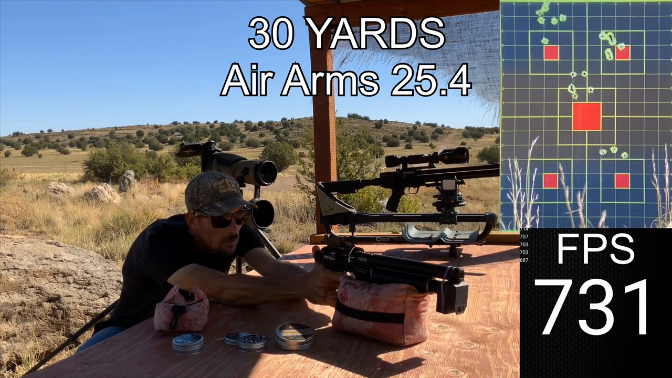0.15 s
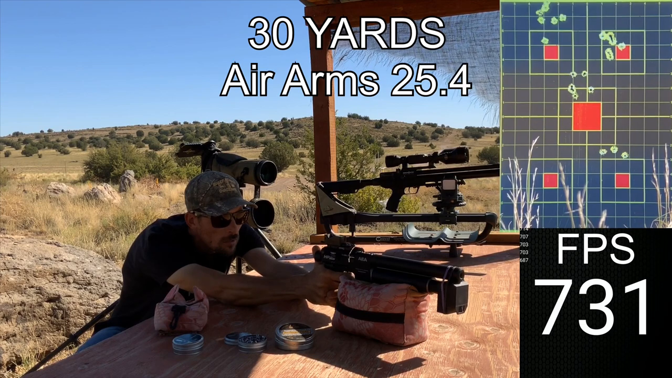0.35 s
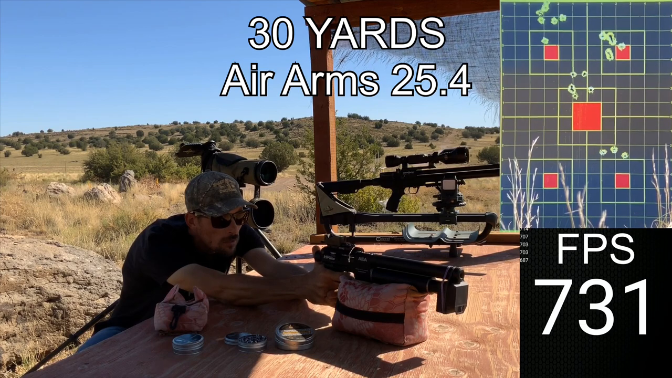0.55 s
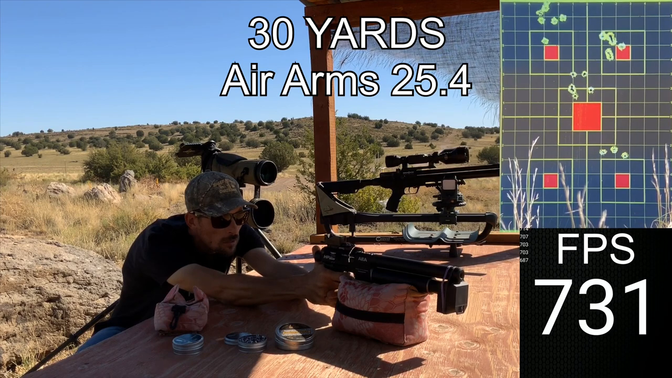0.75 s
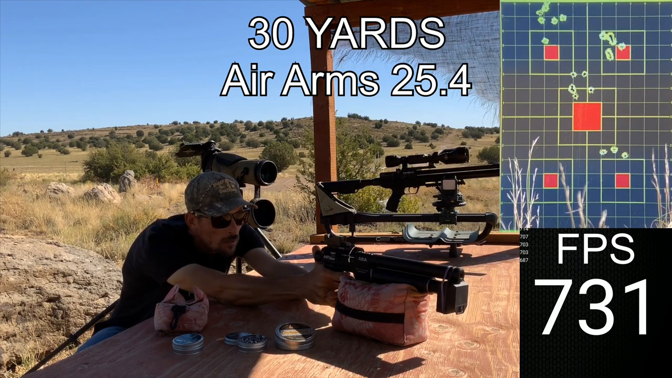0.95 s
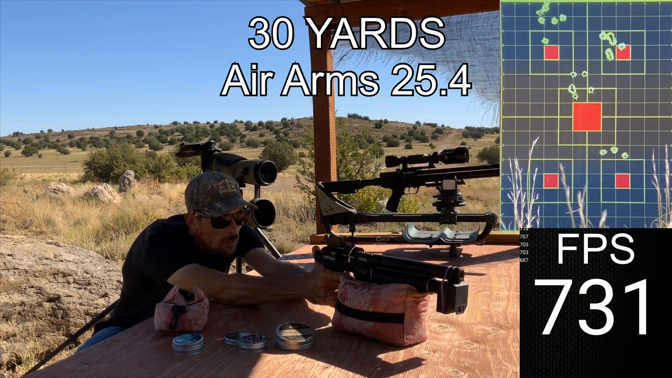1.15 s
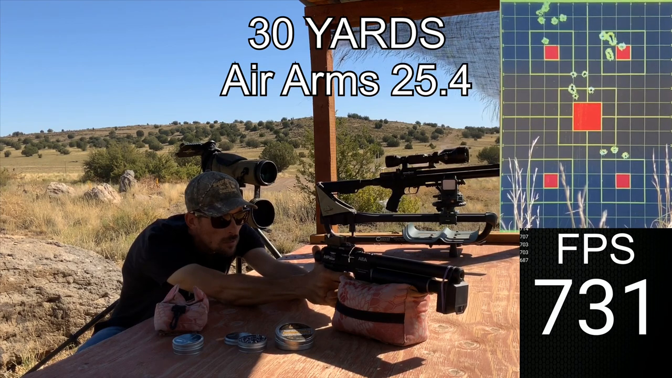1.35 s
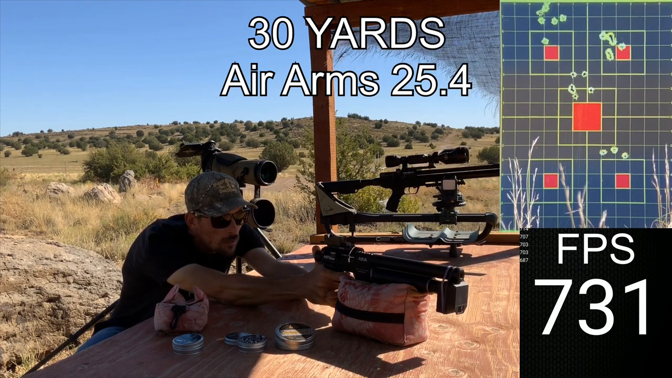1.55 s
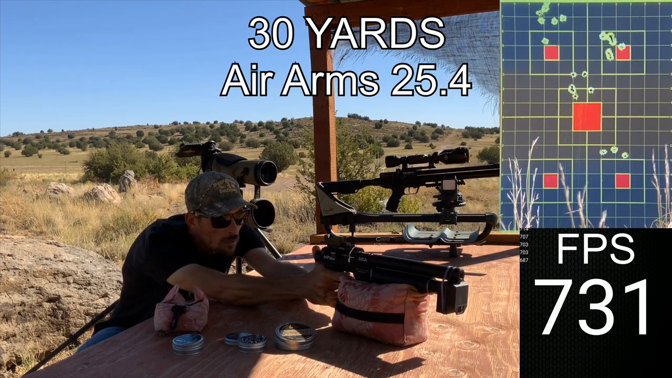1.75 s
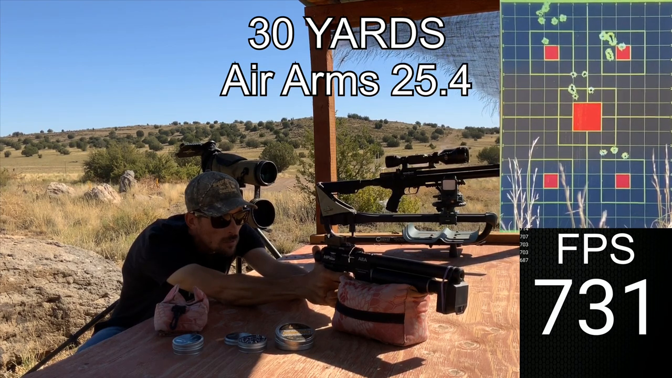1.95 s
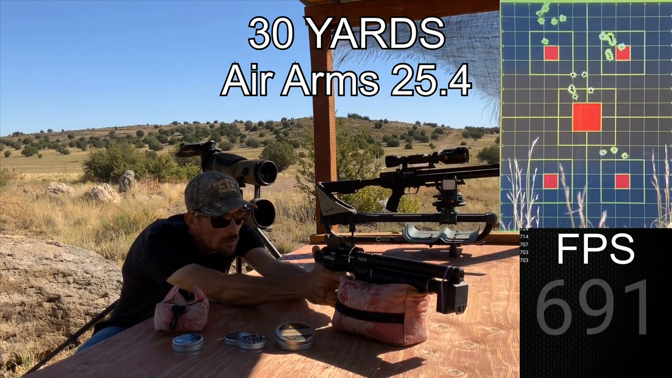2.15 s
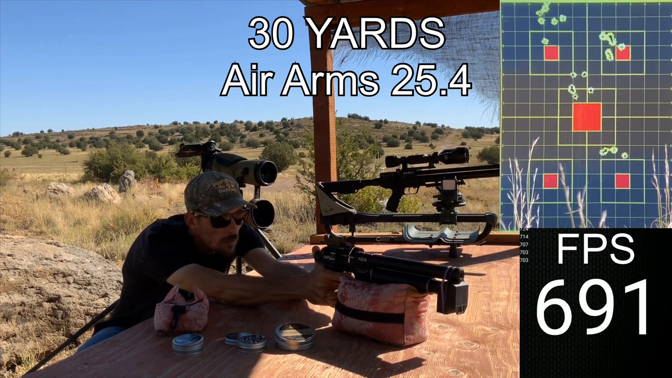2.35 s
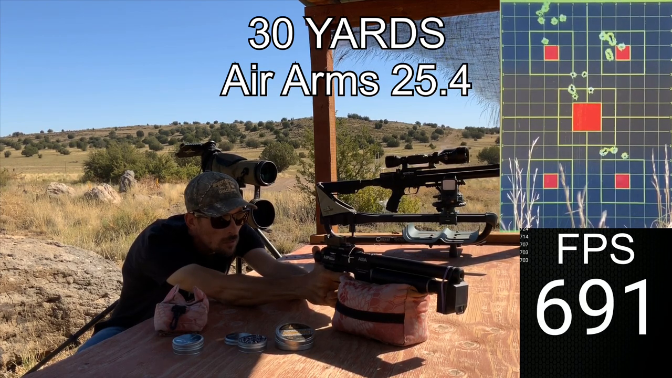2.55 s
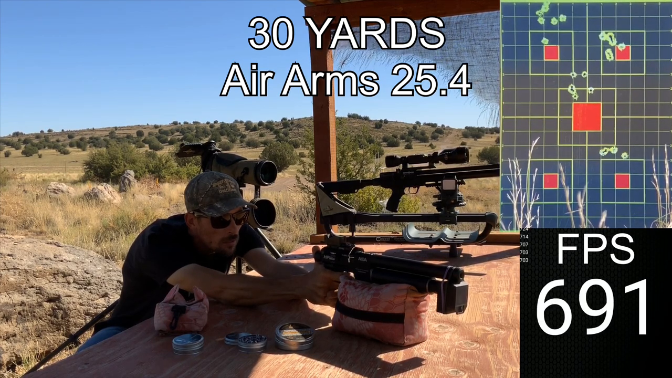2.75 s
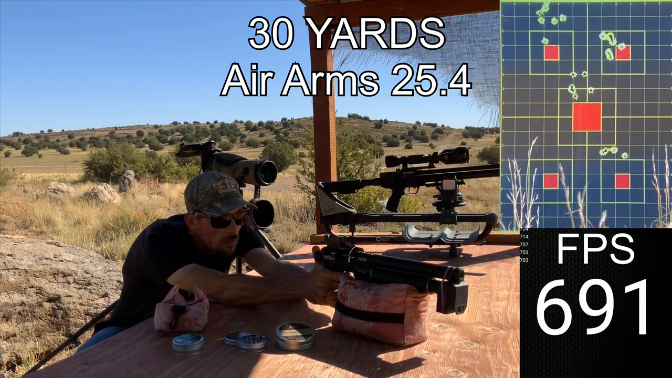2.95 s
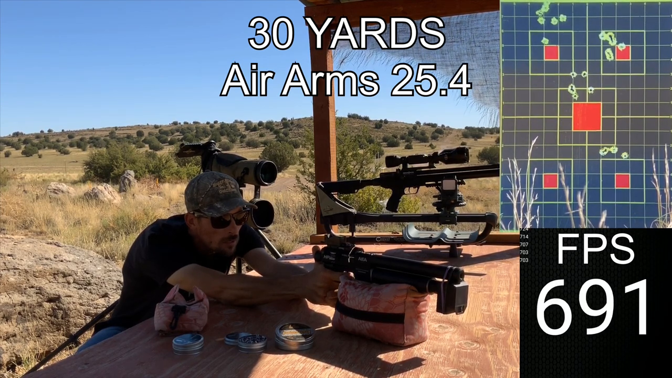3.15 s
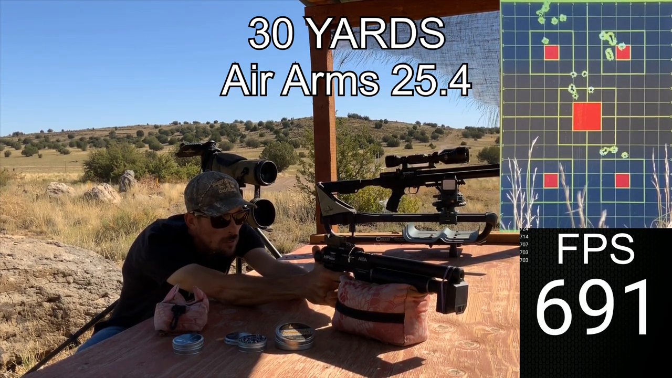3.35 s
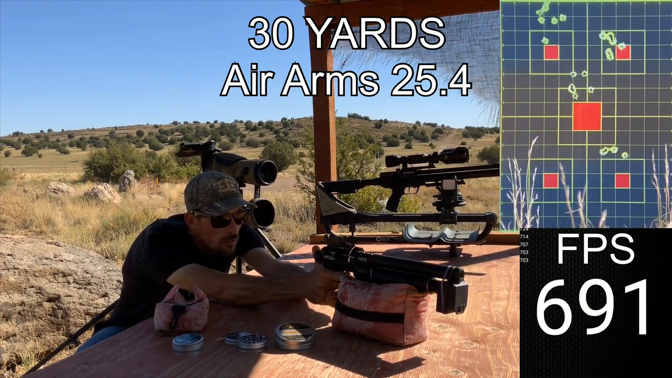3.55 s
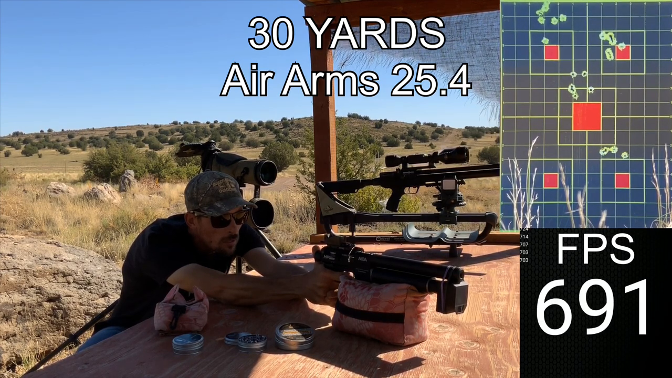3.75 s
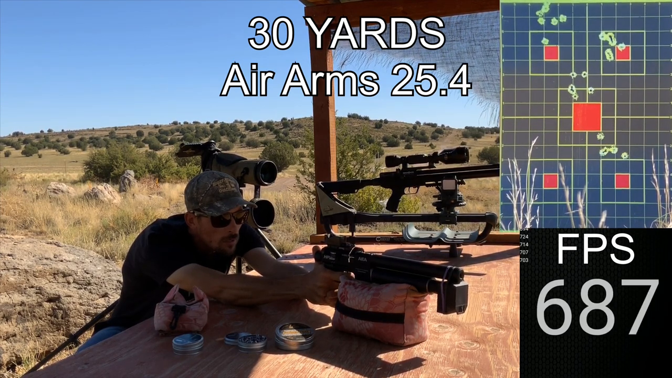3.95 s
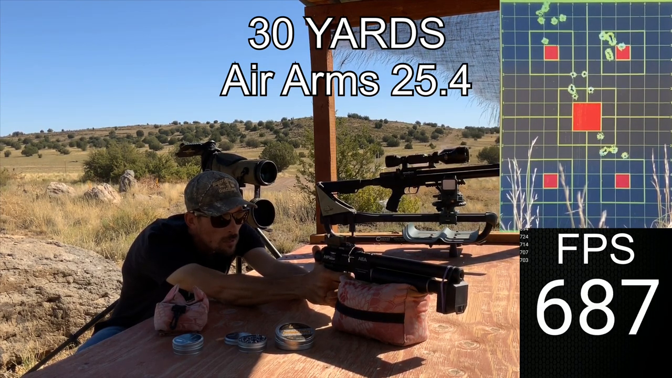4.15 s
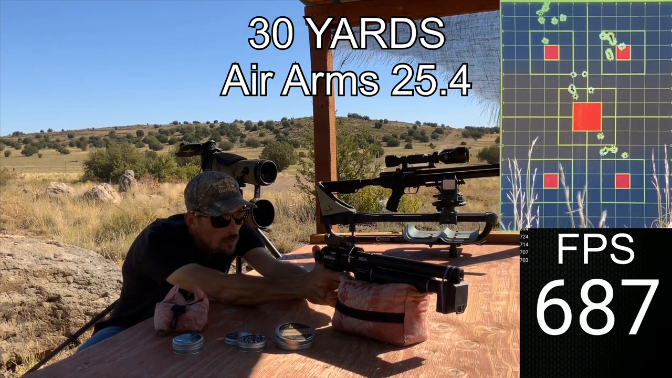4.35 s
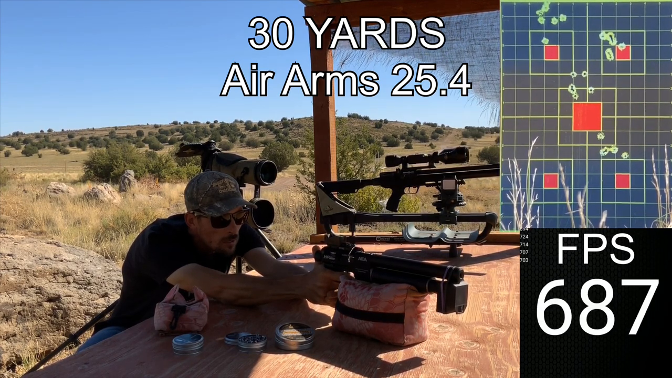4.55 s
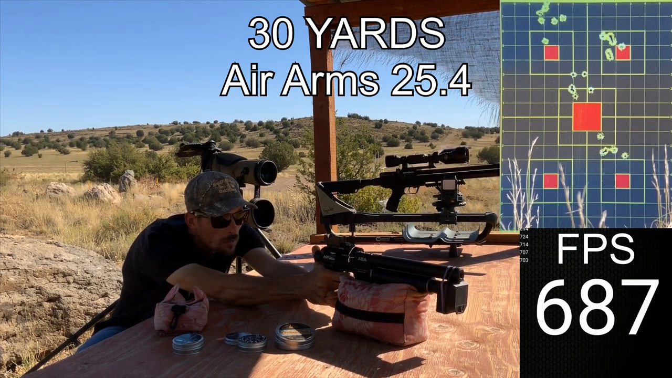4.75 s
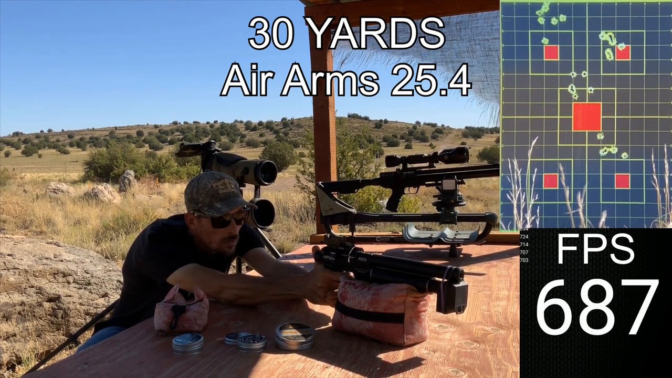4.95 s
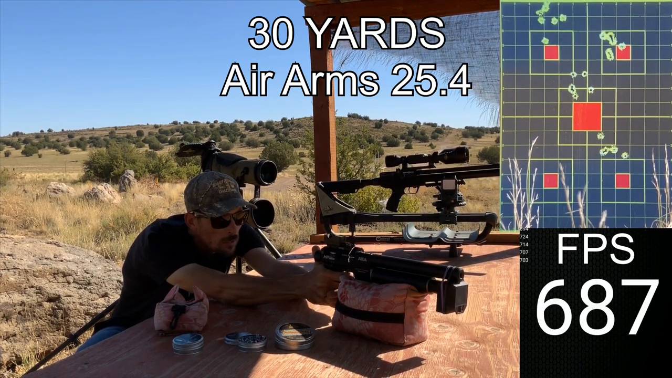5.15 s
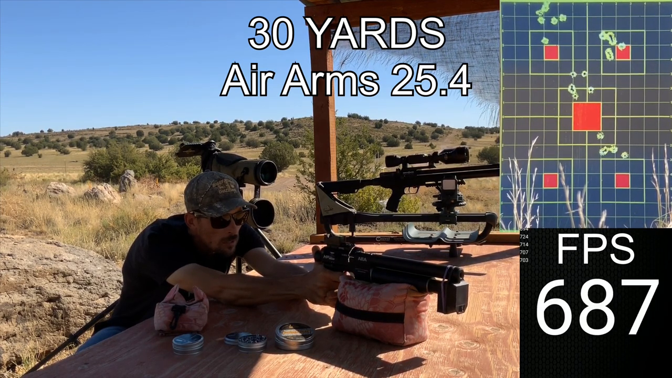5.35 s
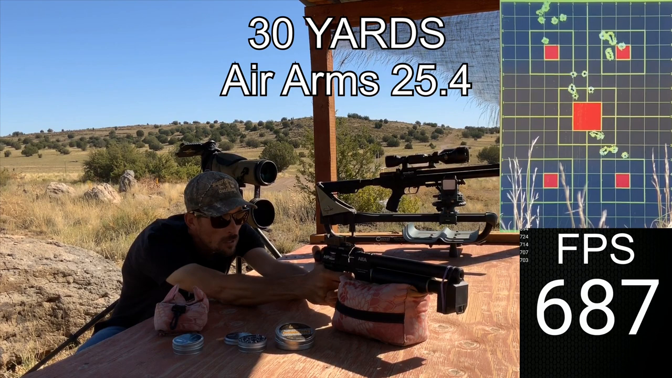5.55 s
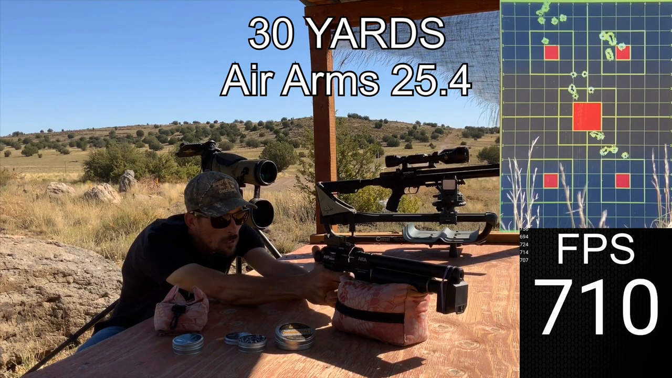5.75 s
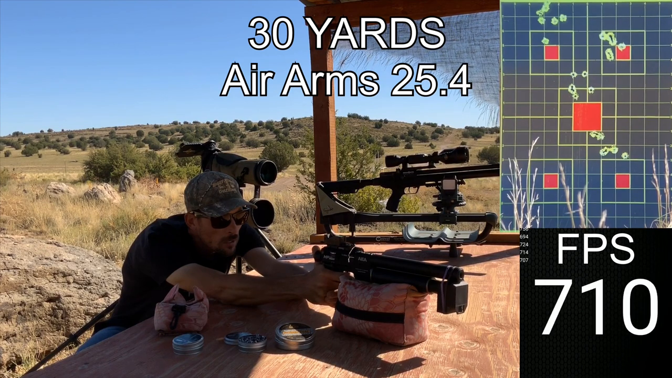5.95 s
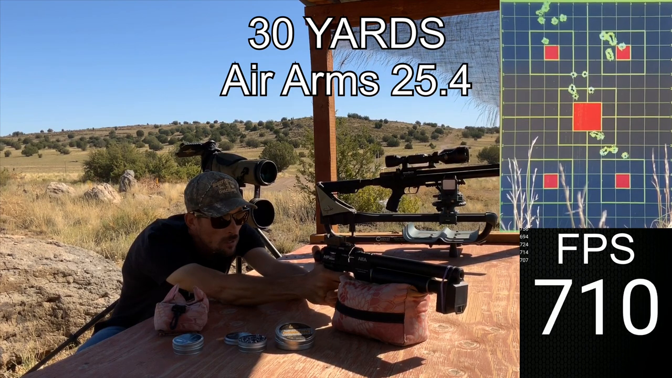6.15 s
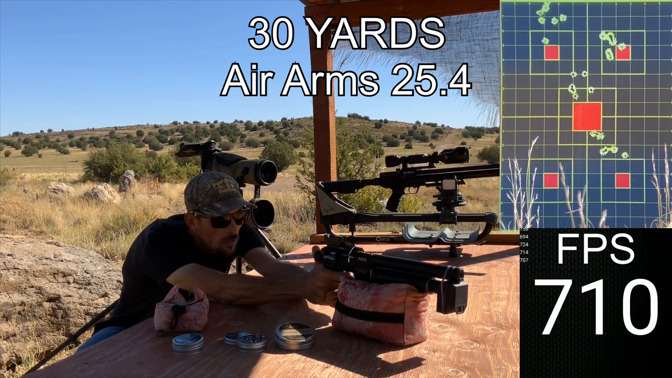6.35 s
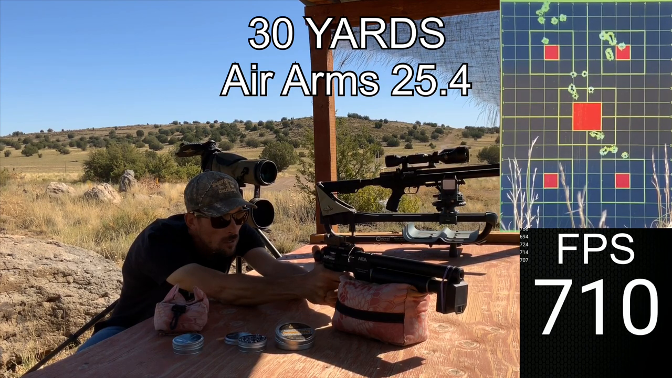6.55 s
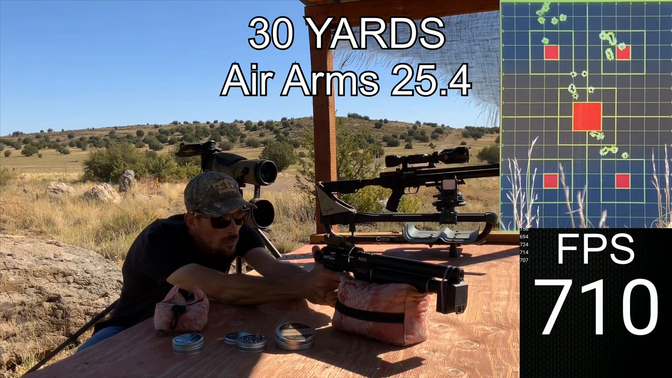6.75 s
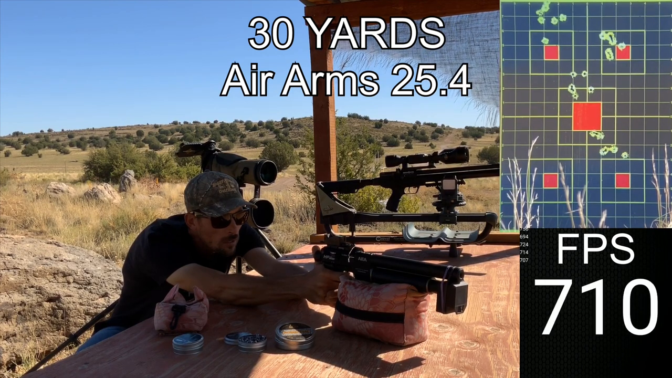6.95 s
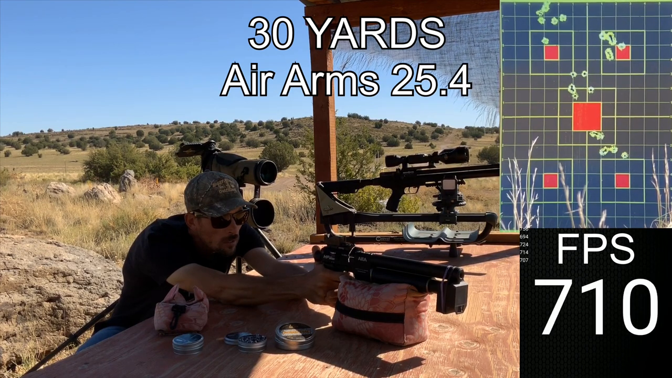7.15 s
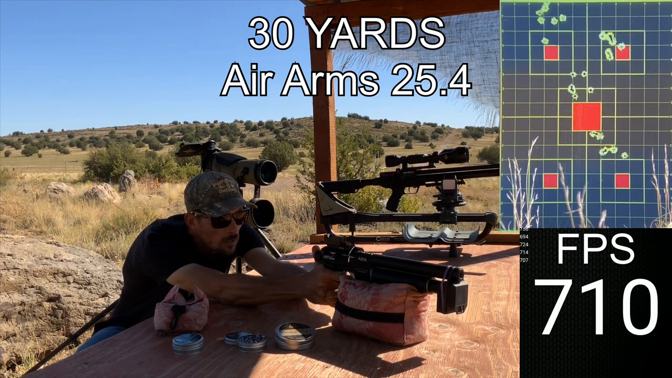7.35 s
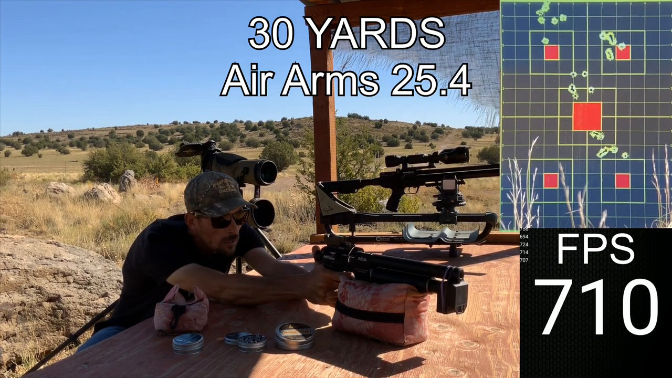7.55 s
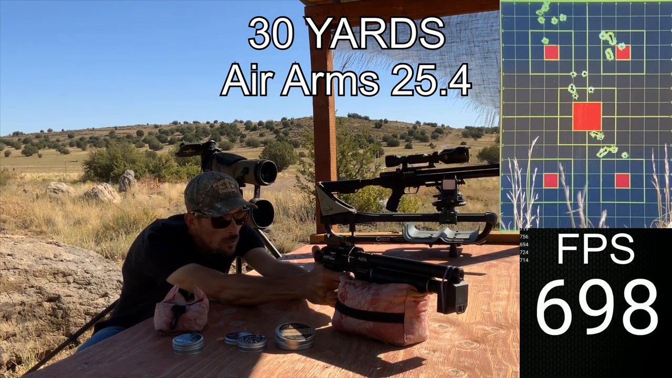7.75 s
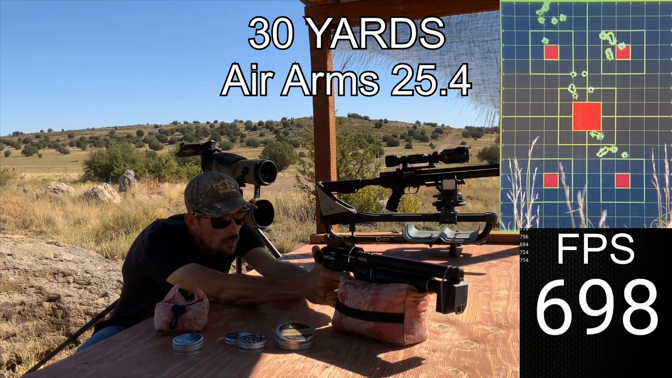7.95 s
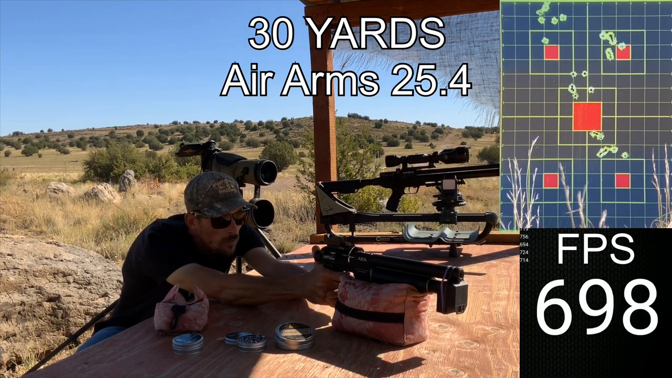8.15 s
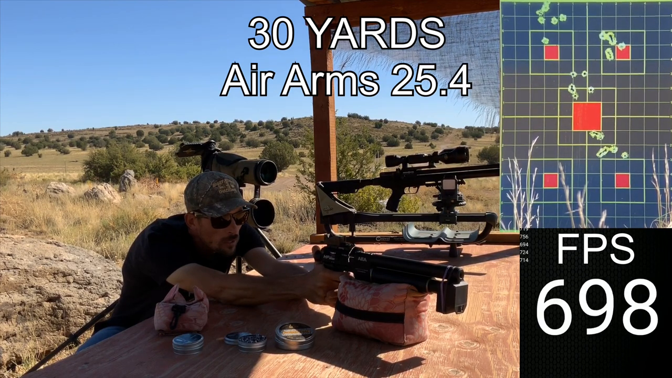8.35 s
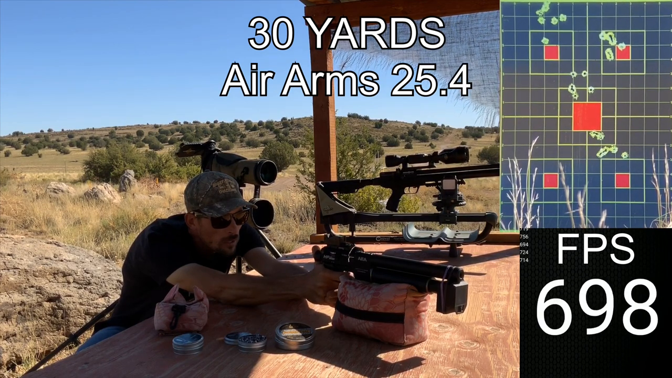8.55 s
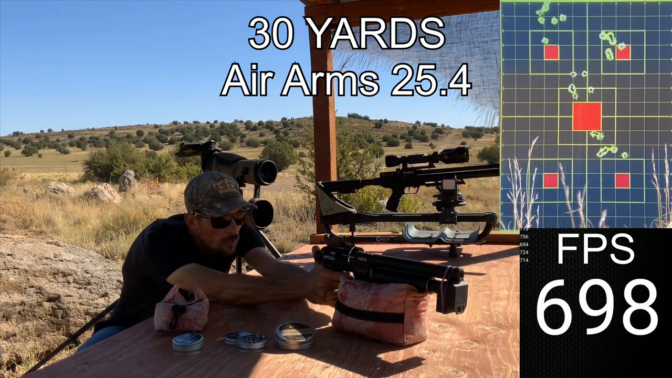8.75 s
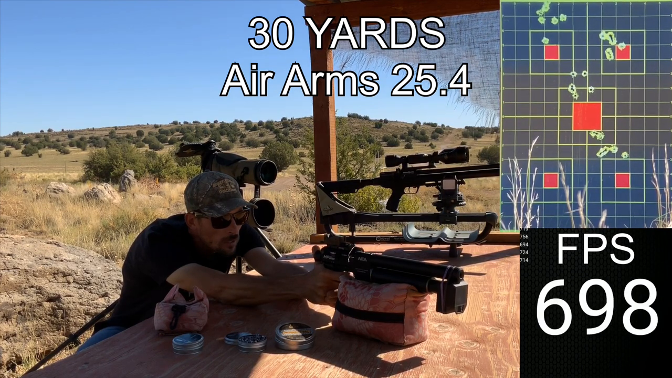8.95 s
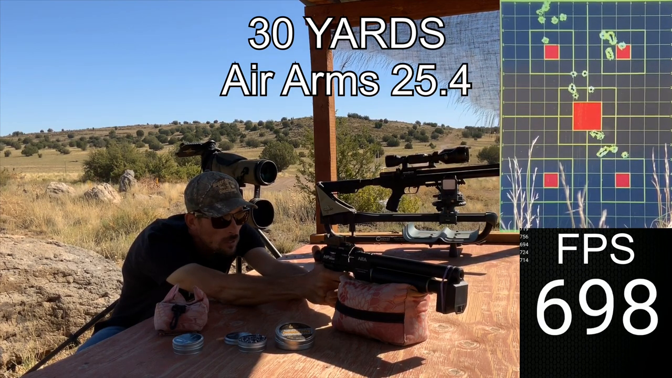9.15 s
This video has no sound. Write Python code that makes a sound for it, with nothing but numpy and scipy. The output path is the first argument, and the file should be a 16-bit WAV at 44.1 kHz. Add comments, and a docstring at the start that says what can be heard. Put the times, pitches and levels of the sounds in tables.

```python
"""An air gun fires five times from a wooden bench under a shelter at an outdoor range.
Each shot is a hiss of valve air, two hard slaps and a boom of the bench. About 0.2 s later the pellet
goes through the target board and rings a steel trap; loose bits patter after the hardest hit.
A few knocks and ticks fall in between. A far engine hums in light wind."""
import sys
import numpy as np
from scipy import signal
from scipy.fft import rfft, irfft
from scipy.io import wavfile
from scipy.ndimage import uniform_filter1d

SR = 44100
rng = np.random.default_rng(int(sys.argv[2]) if len(sys.argv) > 2 else 0)


def generate_wav(signal):
    """Clip the signal to [-1, 1] and save it as 16-bit WAV at the path in sys.argv[1]."""
    frames = np.transpose(np.atleast_2d(signal))
    scaled = np.clip(frames, -1, 1) * 32767
    pcm = np.round(scaled).astype(np.int16)
    wavfile.write(sys.argv[1], SR, pcm)


N = 409688
EVENT_SAMPLES = 2 ** 16
AGE_S = np.arange(EVENT_SAMPLES) / SR
TIME_S = np.arange(N) / SR

# shots: (valve opens [s], air release length [ratio], flight to board [s], board gain [dB],
# trap gain [dB], place on plate [0 centre, 1 edge])
SHOTS = [(.039, 0.97, .203, 0, .5, .08), (2.065, 0.93, .205, 0, 0, .06), (3.795, 1.15, .206, 1, .5, .97),
         (5.349, 1.15, .205, 0, 1.2, .97), (7.285, 1.02, .209, -7, -2, .15)]
# noise colours of a hit in the trap and of a high spray: (frequency [Hz], relative density [dB])
SPLASH_COLOUR = [(700, -1.5), (1050, 7.5), (1500, 9.5), (2000, 4.5), (2800, -7), (4200, -15.5),
                 (5500, -0.5), (7000, 2.5), (8800, -1.5), (10000, -25), (15000, -34.5)]
SPRAY_COLOUR = [(5000, -22.5), (8000, -15), (10000, -4), (11500, 2), (12700, -13), (14000, -7.5),
                (15500, -19.5)]


def amp(db):
    """Decibels to gain."""
    return 10 ** (np.asarray(db) / 20)


def gains(points, size):
    """Gain per Fourier bin from (frequency [Hz], level [dB]) points."""
    hz, db = np.transpose(points)
    bin_hz = np.arange(size // 2 + 1) * SR / size
    return amp(np.interp(np.log(bin_hz + 1), np.log(hz), db))


def noise(colour, size, count):
    """Independent noises of one colour, rms 1, rolled off below its lowest point."""
    hz = np.arange(size // 2 + 1) * SR / size
    skirt = np.minimum(hz / colour[0][0], 1) ** 4
    x = irfft(rfft(rng.standard_normal((count, size))) * gains(colour, size) * skirt, size)
    return x / x.std()


def stereo(mid, side):
    """Mid/side to left/right."""
    return np.stack([mid + side, mid - side], axis=-2)


def swell(rise_s, t60_s):
    """Smooth rise, exponential decay."""
    attack = np.sin(np.pi / 2 * np.minimum(AGE_S / rise_s, 1)) ** 2
    return attack * np.exp(-np.log(1000) * np.maximum(AGE_S - rise_s, 0) / t60_s)


def walk(rate_hz):
    """Smoothed random steps, spread near 1."""
    size = int(SR / rate_hz)
    steps = np.repeat(rng.standard_normal(N // size + 1), size)
    return uniform_filter1d(steps[:N], size)


def humps(rows):
    """Bell-shaped level lifts over time, in dB."""
    return sum(db * np.exp(-((TIME_S - peak_s) / half_s) ** 2) for peak_s, half_s, db in rows)


def add(out, start_s, x):
    """Mix in one event."""
    i = max(int(start_s * SR), 0)
    out[:, i:i + EVENT_SAMPLES] += x[..., :N - i]


def bursts(colour, db, wide_db, grain_db=2, alike_hz=2800, grain_samples=48):
    """One gritty stereo noise per shot: lows repeat from shot to shot, highs are new."""
    # stereo width: (frequency [Hz], side minus mid before wide_db [dB])
    width = [(60, -16), (150, -13), (330, -12.5), (520, -4.5), (1200, -10.5), (2200, 1.5), (4400, -3),
             (8000, -11), (15000, -16.5)]
    count = len(SHOTS) + 1
    spectra = rfft(noise(colour, EVENT_SAMPLES, count=2 * count)).reshape(2, count, -1)
    hz = np.arange(spectra.shape[-1]) * SR / EVENT_SAMPLES
    alike = 1 / (1 + (hz / alike_hz) ** 2)
    mid, side = np.sqrt(alike) * spectra[:, :1] + np.sqrt(1 - alike) * spectra[:, 1:]
    side = side * gains(width, EVENT_SAMPLES) * amp(wide_db)
    # turbulence and scattered paths: the level jumps by the millisecond
    jumps = uniform_filter1d(rng.standard_normal(EVENT_SAMPLES), grain_samples)
    jumps = uniform_filter1d(jumps, grain_samples)
    grit = amp(grain_db * jumps / jumps.std())
    return amp(db) * grit / np.sqrt(np.mean(grit ** 2)) * stereo(irfft(mid), irfft(side))


def wind(start_db=-56, fall_db_per_s=0.63, side_db=-14, eddy_db=2, eddy_top_hz=700, hiss_db=-76.5):
    """Low wind dies down between gusts and shakes in eddies, with a faint flickering hiss."""
    # gusts: (peak [s], half length [s], lift [dB])
    gusts = [(1.6, 0.38, 1), (2.55, .3, 4), (5.9, .5, 4)]
    # wind and hiss colours: (frequency [Hz], relative density [dB])
    air_colour = [(45, -39.5), (60, -20), (75, -3.5), (166, -1.5), (195, -9.5), (249, -11.5), (290, -16.5),
                  (659, -28.5), (962, -33), (2280, -44), (11000, -51.5), (16000, -62)]
    hiss_colour = [(500, 1.5), (3000, -2.5), (9500, -10), (11000, -5), (12500, -15.5), (16000, -20)]
    level_db = start_db - fall_db_per_s * TIME_S + humps(gusts)
    mid, side = noise(air_colour, N, count=2)
    air = stereo(mid, amp(side_db) * side) * amp(level_db)
    low = signal.sosfiltfilt(signal.butter(2, eddy_top_hz, fs=SR, output="sos"), air)
    hiss = amp(hiss_db) * noise(hiss_colour, N, count=1)
    eddies = amp(eddy_db * walk(rate_hz=9))
    flicker = amp(2.87 * walk(rate_hz=51))
    return low * eddies + (air - low) + hiss * flicker


def engine(start_hz=81.85, climb_hz_per_s=0.075, drift=0.0024,
           base_db=-61, growth_db=4, growth_s=4, waver_db=4):
    """A far engine gains a little speed and level; fundamental and overtones swell unequally."""
    # engine harmonics: (order, relative level [dB])
    harmonics = [(1, 1.5), (2, -7), (3, -10.5), (4, -20.5), (5, -30)]
    # hum swells: (peak [s], half length [s], fundamental lift [dB], overtone lift [dB])
    hum_swells = [(1.85, 0.49, 2.5, 14), (2.598, 0.47, 7, 4), (4.869, .42, 7.5, 13.5),
                  (5.95, .45, 6.5, 3.5), (7.297, .8, 5.5, -2.5), (8.704, 0.46, 4.5, 8)]
    hz = start_hz + climb_hz_per_s * TIME_S
    level_db = base_db - growth_db * np.maximum(1 - TIME_S / growth_s, 0)
    fundamental_db = humps([(s, half_s, db) for s, half_s, db, _ in hum_swells])
    overtone_db = humps([(s, half_s, db) for s, half_s, _, db in hum_swells])
    phase = 2 * np.pi * np.cumsum(hz * (1 + drift * walk(rate_hz=4))) / SR
    out = 0
    for order, db in harmonics:
        lift_db = fundamental_db if order == 1 else overtone_db
        out += amp(level_db + db + lift_db + waver_db * walk(rate_hz=3)) * np.sin(order * phase)
    return out


def knocks(rise_s=0.013, overtone_ratio=1.6, overtone_db=-8):
    """Dull blows on wood: a low mode and a faster-decaying overtone."""
    # blows: (time [s], level [dB], pitch [Hz], t60 [s])
    blows = [(1.18, -38, 115, 0.11), (5.626, -18, 210.4, 0.062), (5.644, -32, 158, 0.42),
             (5.70, -31.5, 117.3, 0.41)]
    out = np.zeros((2, N))
    for start_s, db, hz, t60_s in blows:
        phase = 2 * np.pi * hz * AGE_S
        low = np.sin(phase) * swell(rise_s, t60_s)
        overtone = amp(overtone_db) * np.sin(overtone_ratio * phase) * swell(rise_s, t60_s / 2)
        add(out, start_s, amp(db) * (low + overtone))
    return out


def ticks(rise_share=0.19, skirt_db=-21):
    """Damped rattles, each around one pitch; the shorter, the sharper the attack."""
    # small taps: (time [s], level [dB], pitch [Hz], t60 [s])
    taps = [(2.90, -69, 1100, 0.11), (3.59, -66.5, 1087, 0.13), (5.758, -46, 4300, 0.011),
            (5.797, -58, 5400, .015), (5.821, -71.5, 5500, 0.018), (8.59, -73, 1294, .1),
            (8.88, -70, 1090, .08), (9.11, -72, 1190, 0.069)]
    out = np.zeros((2, N))
    for start_s, db, hz, t60_s in taps:
        colour = [(hz / 2, skirt_db), (hz, 0), (hz * 2, skirt_db), (hz * 10, 4 * skirt_db)]
        rattle = noise(colour, EVENT_SAMPLES, count=1)[0]
        add(out, start_s, amp(db) * rattle * swell(rise_share * t60_s, t60_s))
    return out


def fragments(start_s=5.68, end_s=5.82, max_db=-54, range_db=8, count=14):
    """Loose bits patter down in the trap after the hardest hit."""
    out = np.zeros((2, N))
    grains = noise(SPLASH_COLOUR, EVENT_SAMPLES, count) * swell(rise_s=0.0011, t60_s=0.092)
    for grain, (when, size) in zip(grains, rng.random((count, 2))):
        add(out, start_s + when * (end_s - start_s), amp(max_db - range_db * (1 - size)) * grain)
    return out


def plate(place, gain_db=2, rise_s=0.01, spread_rad=0.47, detune=0.0006):
    """Steel plate modes build up as the pellet rattles in; the place of the blow sets their mix."""
    # trap plate modes: (frequency [Hz], centre-hit level [dB], edge-hit level [dB], t60 [s])
    modes = [(705, -50, -45, .5), (740, -54.5, -43, 0.42), (888, -42.5, -43, 0.41), (983, -41, -38, 0.32),
             (1051.5, -20.5, -42, 0.1), (1198, -34.5, -40.5, 0.28), (1377, -22, -39.5, 0.34),
             (1436, -25, -53.5, 0.15), (1486, -36.5, -39.5, .3), (1553, -34, -34.5, 0.37),
             (1625, -42, -40, 0.42), (1655, -33, -35, 0.4), (1887, -44.5, -54, 0.83),
             (2030, -52, -43.5, 0.43), (2023, -52, -54, .45), (2137, -55.5, -51, 1.3),
             (2320, -54, -47, 0.45), (2342, -58.5, -48.5, 0.5), (3740, -70, -63.5, 0.47),
             (4100, -62.5, -66.5, 0.62), (5170, -50.5, -59, .35)]
    out = 0
    for hz, centre_db, edge_db, t60_s in modes:
        phase = rng.uniform(0, 2 * np.pi) + spread_rad * rng.standard_normal((2, 1))
        tone = np.sin(2 * np.pi * hz * (1 + detune * rng.standard_normal()) * AGE_S + phase)
        out += amp(gain_db + centre_db + place * (edge_db - centre_db)) * tone * swell(rise_s, t60_s)
    return out


def target(board_to_trap_s=0.0395, splash_delay_s=0.003, clang_delay_s=0.019, left_db=2):
    """The pellet raps the board, splashes in the trap and glances onto the plate, which clangs."""
    # impact colours: (frequency [Hz], relative density [dB])
    board_colour = [(400, -16), (850, -19.5), (1100, -5.5), (1500, -8), (2000, -2.5), (2600, -26),
                    (5500, -25.5), (9000, -35.5), (15000, -46)]
    clang_colour = [(110, 2.5), (300, -8.5), (600, -10.5), (850, -9.5), (1050, 2.5), (1600, -1),
                    (2100, -6.5), (2700, -23.5), (5300, -18), (8000, -27), (15000, -48.5)]
    board = bursts(board_colour, db=-37, wide_db=-12.5) * swell(rise_s=0.011, t60_s=0.2)
    touch = bursts(SPLASH_COLOUR, db=-27, wide_db=-9) * swell(rise_s=0.00046, t60_s=0.007)
    splash = bursts(SPLASH_COLOUR, db=-25, wide_db=5) * swell(rise_s=0.0028, t60_s=0.15)
    spray = bursts(SPRAY_COLOUR, db=-40.5, wide_db=-13.5) * swell(rise_s=0.02, t60_s=0.14)
    clang = bursts(clang_colour, db=-27, wide_db=-5.5) * swell(rise_s=0.0061, t60_s=0.28)
    pan = amp(np.array([[left_db], [-left_db]]) / 2)
    out = np.zeros((2, N))
    for k, (fired_s, _, flight_s, board_db, trap_db, place) in enumerate(SHOTS):
        board_s = fired_s + flight_s
        trap_s = board_s + board_to_trap_s
        add(out, board_s, amp(board_db) * board[k])
        add(out, trap_s, amp(trap_db) * touch[k])
        add(out, trap_s + splash_delay_s, amp(trap_db) * (splash[k] + spray[k]))
        add(out, trap_s + clang_delay_s, amp(trap_db) * pan * (clang[k] + plate(place)))
    return out


def bench(recoil_rise_s=0.01, slap_rise_s=0.012):
    """The bench top booms under the recoil and again under the slaps; close modes beat."""
    # bench top modes: (frequency [Hz], recoil level [dB], slap level [dB], t60 [s])
    modes = [(39.6, -45.5, -39.5, 0.051), (72, -31.5, -27.5, 0.25), (111, -34, -31.5, 0.38),
             (119.6, -29.5, -21, 0.44), (143, -15, -21.5, 0.096), (167, -41, -33.5, 0.95),
             (210.7, -41, -31.5, 0.25), (245, -40, -39, 0.23), (298, -40.5, -37, 0.26)]
    recoil_boom = slap_boom = 0
    for hz, recoil_db, slap_db, t60_s in modes:
        tone = np.sin(2 * np.pi * hz * AGE_S)
        recoil_boom += amp(recoil_db) * tone * swell(recoil_rise_s, t60_s)
        slap_boom += amp(slap_db) * tone * swell(slap_rise_s, t60_s)
    return recoil_boom, slap_boom


def barrel(rise_s=0.018, scatter_db=2):
    """The gun's metal rings thinly, a little differently each shot."""
    # barrel and air tube modes: (frequency [Hz], level [dB], t60 [s])
    modes = [(4526, -45, .22), (5076, -50, .5), (5210, -51, 0.8), (5140, -48, .35), (5290, -51, .5),
             (6500, -45, .28), (6910, -42, .26)]
    out = 0
    for hz, db, t60_s in modes:
        gain = amp(db + scatter_db * rng.standard_normal())
        out += gain * np.sin(2 * np.pi * (hz * AGE_S + rng.random())) * swell(rise_s, t60_s)
    return out


def gun(slap_delay_s=0.0485):
    """Hammer slide, valve air, two hard slaps; the shelter shimmers, the scrub scatters a wash back."""
    # colours of the parts of a shot: (frequency [Hz], relative density [dB])
    hammer_colour = [(800, -8), (2500, -7.5), (5100, 1), (7000, -2), (10000, -11.5), (15000, -22.5)]
    valve_colour = [(180, -43.5), (300, -13), (656, -15), (900, 2.5), (1060, -5.5), (1750, -9.5),
                    (2400, -14), (2610, -10), (2930, -6), (3580, -9), (4440, -3), (6850, -1), (7690, -9),
                    (12700, -23.5), (16000, -31)]
    muzzle_colour = [(200, -1), (600, -5.5), (880, -2), (1250, 0), (1700, 8.5), (2400, -3.5), (6000, -5.5),
                     (9000, -21.5), (15000, -27.5)]
    slap_colour = [(150, -9), (300, 1), (550, -2.5), (780, 3), (1100, -2), (1700, -0.5), (2800, -12.5),
                   (4200, -7.5), (6000, -4), (8500, -9.5), (11500, -14.5), (15500, -17.5)]
    thud_colour = [(110, -3.5), (190, -1), (300, -3.5), (420, -6.5), (600, -23), (2000, -50)]
    rumble_colour = [(70, -8.5), (90, 1), (170, 3.5), (230, -4.5), (400, -25), (1500, -56.5)]
    bright_colour = [(150, -1.5), (300, 3), (420, 4), (600, -9.5), (790, 6), (1100, 2.5), (1700, 2.5),
                     (2700, -14), (4000, -11), (5500, -5), (8000, -8), (11200, -2.5), (12800, -12),
                     (15500, -13.5)]
    shimmer_colour = [(3500, -18.5), (4700, -8.5), (5200, 2), (5800, -5.5), (6600, -1.5), (9000, -8),
                      (11200, -3), (15000, -13)]
    wash_colour = [(150, 1), (400, -6), (650, -5.5), (1200, 2), (1900, -5.5), (2800, -17.5), (4400, -13.5),
                   (5200, -13), (6200, -13.5), (8000, -18), (11000, -20), (15500, -28)]
    hammer = bursts(hammer_colour, db=-41, wide_db=-21) * swell(rise_s=0.014, t60_s=0.04)
    valve = bursts(valve_colour, db=-11, wide_db=-36.5)
    muzzle = bursts(muzzle_colour, db=-25, wide_db=-14) * swell(rise_s=0.0036, t60_s=0.15)
    crack = bursts(slap_colour, db=-14, wide_db=-9, grain_db=2.5) * swell(0.00093, 0.0092)
    slap = bursts(slap_colour, db=-16.5, wide_db=6, grain_db=2.5) * swell(0.0064, 0.042)
    thud = bursts(thud_colour, db=-22.5, wide_db=3, grain_db=4.5) * swell(0.0059, 0.052)
    rumble = bursts(rumble_colour, db=-33, wide_db=-5.5, grain_db=-0.5) * swell(0.045, 0.5)
    bright_slap = bursts(bright_colour, db=-12.5, wide_db=-11.5, grain_db=1.5) * swell(0.004, 0.088)
    snap = bursts(SPRAY_COLOUR, db=-14.5, wide_db=-10, grain_db=0.5) * swell(0.0034, 0.023)
    shimmer = bursts(shimmer_colour, db=-38.5, wide_db=-4.5) * swell(0.017, 0.25)
    field_wash = bursts(wash_colour, db=-40.5, wide_db=-4.5, grain_db=0.5) * swell(0.0092, 0.59)
    hill_wash = bursts(wash_colour, db=-53, wide_db=-2, grain_db=3.5) * swell(0.2, 1.33)
    recoil_boom, slap_boom = bench()
    out = np.zeros((2, N))
    for k, (fired_s, release_ratio, *_) in enumerate(SHOTS):
        slap_s = fired_s + slap_delay_s
        add(out, fired_s - 0.01, hammer[k])
        add(out, fired_s, valve[k] * swell(rise_s=0.015, t60_s=0.082 * release_ratio) + barrel())
        add(out, fired_s + 0.0195, recoil_boom + muzzle[k])
        add(out, slap_s - 0.001, slap[k] + field_wash[k] + hill_wash[k])
        add(out, slap_s + 0.0007, crack[k])
        add(out, slap_s + 0.004, slap_boom + thud[k] + rumble[k])
        add(out, slap_s + 0.0115, bright_slap[k] + snap[k] + shimmer[k])
    return out


def scene():
    """Gun, target, small sounds and open air."""
    small_sounds = knocks() + ticks() + fragments()
    return gun() + target() + small_sounds + wind() + engine()


def record(dry):
    """Soft clip, then a steep low-pass."""
    top_hz = 16100
    rounded = np.tanh(0.75 * dry) / 0.68
    return signal.sosfilt(signal.ellip(10, 0.2, 80, top_hz, fs=SR, output="sos"), rounded)


dry = scene()
out = record(dry)
generate_wav(out)
```